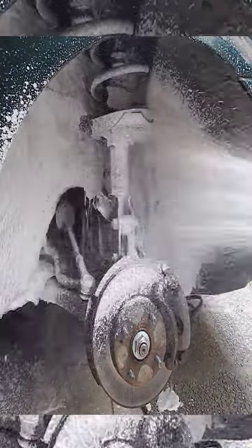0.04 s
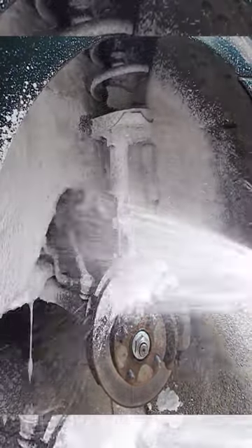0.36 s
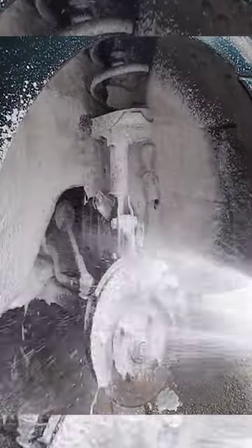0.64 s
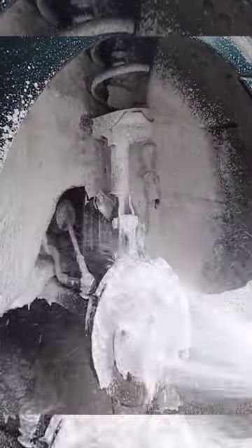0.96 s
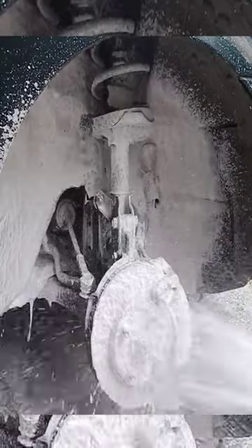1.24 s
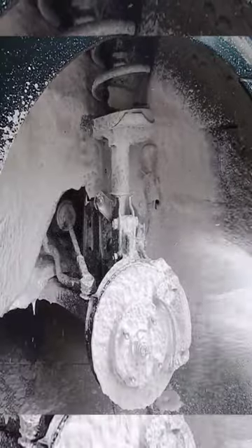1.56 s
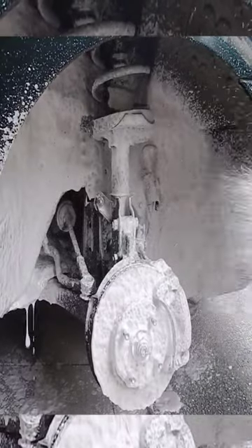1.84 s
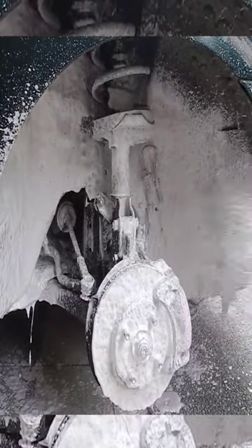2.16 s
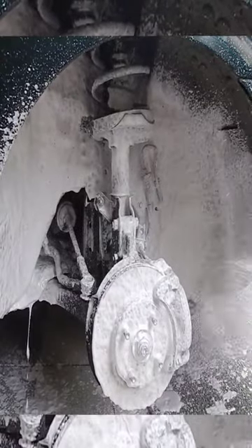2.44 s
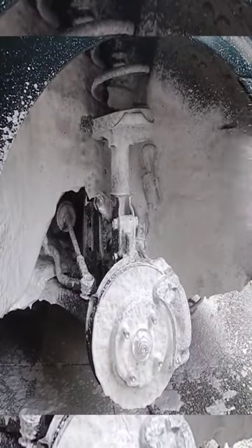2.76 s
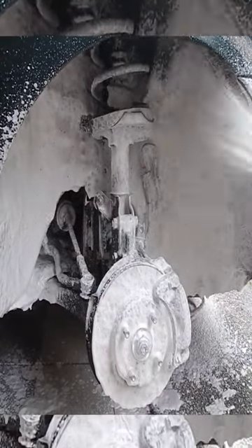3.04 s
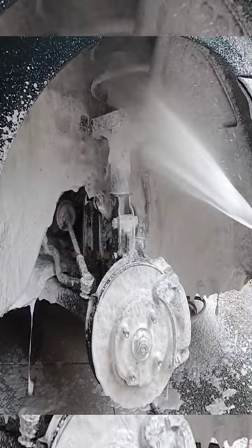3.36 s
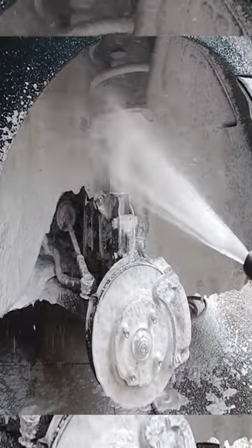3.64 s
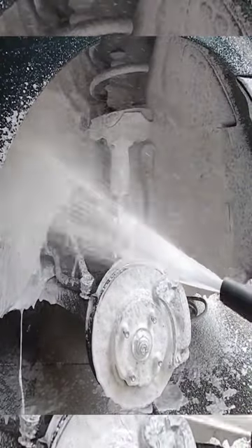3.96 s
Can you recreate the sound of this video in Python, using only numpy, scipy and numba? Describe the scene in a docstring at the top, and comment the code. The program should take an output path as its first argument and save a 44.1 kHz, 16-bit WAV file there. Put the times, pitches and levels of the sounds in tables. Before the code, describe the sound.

A pressure washer sprays foam into a car's wheel arch, hissing and fizzing continuously close to the microphone. The jet splashes on metal and shifts in tone as it sweeps, while the pump drones underneath.

```python
"""At a car's wheel arch, a pressure washer's foam lance sweeps over the arch and brake disc, close by.
The three-piston pump drones and makes the jet's low roar throb; the lance sputters with a ring near 2 kHz.
The spray rings in the hollow arch, splashes on metal and fizzes with fine droplets, its tone changing
as the aim moves. Near the end, a faint draught from the jet reaches the single microphone."""
import sys
import numpy as np
from scipy import signal
from scipy.fft import rfft, irfft
from scipy.io import wavfile
from scipy.ndimage import map_coordinates
from numba import njit

SR = 44100
rng = np.random.default_rng(int(sys.argv[2]) if len(sys.argv) > 2 else 0)


def unload_wav(signal):
    """Save mono or channel-first audio to the path in sys.argv[1] as 16-bit WAV at rate SR, clipped to [-1, 1]."""
    wavfile.write(
        sys.argv[1],
        SR,
        np.round(np.clip(np.atleast_2d(signal).T, -1, 1) * 32767).astype(np.int16),
    )


N = 176400  # 4 seconds
TOP_HZ = 15650  # the treble is cut off above this


def gain(db):
    """Turn decibels into a number to multiply a sound by."""
    return 10 ** (np.asarray(db) / 20)


def normalise(x):
    """Scale a signal so that its average strength (rms) is 1."""
    return x / np.sqrt(np.mean(x ** 2))


def curve(rows):
    """Join (time, value) rows with straight lines, giving one value per sample."""
    return np.interp(np.arange(N) / SR, *np.array(rows).T)


def wander(per_s):
    """A smooth random wobble of strength 1 that changes about per_s times a second."""
    hz = np.arange(N // 2 + 1) * SR / N
    keep_slow = np.exp(-(2 * hz / per_s) ** 2) * (hz > 0)
    return normalise(irfft(rfft(rng.standard_normal(N)) * keep_slow, N))


def colour(x, tone):
    """Shape a sound's tone with (frequency, level) rows, then scale it to strength 1."""
    hz, db = np.array(tone).T
    bin_hz = np.maximum(np.arange(N // 2 + 1) * SR / N, 1)
    bin_db = np.interp(np.log(bin_hz), np.log(hz), db)
    return normalise(irfft(rfft(x) * gain(bin_db), N))


@njit
def resonate(x, hz, width_hz):
    """Let through only a band of sound around a moving pitch (a state-variable filter)."""
    out = np.empty(len(x))
    band_state, low_state = 0., 0.
    for i in range(len(x)):
        tuning, damping = np.tan(np.pi * hz[i] / SR), width_hz / hz[i]
        band = (band_state + tuning * (x[i] - low_state)) / (1 + tuning * (tuning + damping))
        band_state = 2 * band - band_state
        low_state += 2 * tuning * band
        out[i] = damping * band
    return out


def pump_drone(shaft_angle):
    """The shaft and pistons hum in tones that drift and waver; the higher ones waver more."""
    # pump tones; multiples of 3 come from the piston strokes
    # (multiple of shaft speed, relative level at mid-scene [dB], drift [dB/s])
    tones = [(1, -20.5, 0), (2, -24, -1.5), (3, -1.5, 0), (5, -11, -0.5), (6, 0.5, 0), (7, -17, -0.5),
             (8, -8.5, 0.3), (9, -13.5, -0.5), (10, -13, -2), (11, -22, -0.5), (12, -12.5, .5),
             (13, -14.5, -1), (14, -18, 1.5), (15, -22.5, 1), (16, -16.5, 1), (17, -20, -1),
             (18, -11.5, 0.5), (20, -17, 3.5), (25, -15.5, 1)]
    # swell of the tones above the piston stroke as the aim moves (time [s], level [dB])
    overtone_swell = [(0, -1), (.7, 1), (1.1, -1), (1.75, 1), (2.3, 1.5), (2.85, -0.5), (3.25, -2.5),
                      (3.8, -2.5), (4, -1)]
    # loudness of the drone (time [s], level [dB])
    loudness = [(0.0, -34.5), (0.15, -38), (0.63, -36.5), (0.81, -39), (1.14, -36), (1.35, -37), (1.5, -36),
                (1.92, -36.3), (2.25, -42), (2.76, -36), (3.03, -34), (3.12, -39), (3.54, -35),
                (3.63, -36.5), (3.96, -31), (4.0, -33.6)]
    swell_db = curve(overtone_swell)
    from_middle_s = (np.arange(N) - N / 2) / SR
    drone = 0
    for multiple, db, drift in tones:
        waver_db = 1.5 * np.sqrt(multiple / 10) * wander(per_s=6.5)
        strength = gain(db + drift * from_middle_s + waver_db + (multiple > 3) * swell_db)
        drone += strength * np.sin(multiple * shaft_angle + 2 * np.pi * rng.random())
    return normalise(drone) * gain(curve(loudness) + 1)


def jet_roar(shaft_angle):
    """The jet drums in the arch, throbbing with each turn of the pump."""
    # loudness of the low roar (time [s], level [dB])
    loudness = [(0.0, -37), (0.09, -40), (0.6, -38.0), (0.66, -36.5), (0.75, -38.5), (0.99, -38.5),
                (1.11, -41), (1.23, -39), (1.47, -39.6), (1.65, -37.1), (1.86, -37.5), (1.98, -41),
                (2.37, -42.5), (2.61, -38), (2.91, -38), (3.15, -42), (3.69, -39), (4.0, -33)]
    # tone of the roar (frequency [Hz], relative level [dB])
    tone = [(25, -26), (50, -14), (95, -3), (150, -8.5), (240, -1), (480, 0.5), (740, -3.5), (1130, -.5),
            (1400, -5.5), (1700, 0), (1950, -5), (2400, -7.5), (3200, -19), (6000, -50)]
    throb = 1 + 0.24 * np.cos(shaft_angle)
    roar = colour(rng.standard_normal(N) * throb, tone)
    flicker_db = wander(per_s=28)
    return roar * gain(curve(loudness) + flicker_db)


def lance_ring():
    """Air and foam make the lance ring at one wavering pitch, in quick sputters."""
    # pitch at which the lance rings (time [s], frequency [Hz])
    pitch = [(0, 1960), (0.2, 1960), (0.38, 1960), (0.75, 1960), (1.05, 1974), (1.24, 2020), (1.48, 1920),
             (1.6, 1989), (2.0, 1920), (2.5, 1977), (2.9, 1955), (3.3, 1936), (3.53, 2030), (3.7, 1960),
             (4, 1990)]
    # loudness of the ring (time [s], level [dB])
    loudness = [(0.0, -34), (0.12, -36.5), (0.27, -33.5), (0.48, -37.5), (0.57, -33.5), (0.69, -37),
                (1.11, -35.3), (1.17, -40.5), (1.38, -34), (1.44, -36), (1.83, -35.5), (1.98, -35),
                (2.46, -39.5), (2.58, -38), (3.03, -31.5), (3.12, -39.5), (3.39, -36.6), (3.6, -39.2),
                (3.84, -34.5), (4.0, -37.5)]
    hz = curve(pitch) + 24 * wander(per_s=25)
    flow = resonate(rng.standard_normal(N), hz, width_hz=1090.)
    sputter_db = 2 * np.tanh(wander(per_s=160))
    ring = resonate(flow, hz, width_hz=123.) * gain(sputter_db)
    return normalise(ring) * gain(curve(loudness) + 0.4)


def arch_ring():
    """The spray makes the hollow arch ring near 3 kHz."""
    # loudness of the hollow ring (time [s], level [dB])
    loudness = [(0, -43.5), (.09, -42.5), (.24, -37.5), (.39, -43.5), (.75, -38), (.81, -44), (1.05, -40.5),
                (1.2, -42), (1.35, -39.5), (1.44, -42), (1.8, -39.5), (2.19, -39.5), (2.45, -47.5),
                (2.68, -42), (2.73, -36.5), (2.92, -35.5), (3.02, -38), (3.07, -45.5), (3.18, -43),
                (3.42, -46.5), (3.74, -42.5), (3.81, -37), (4, -36.5)]
    # tone of the hollow ring (frequency [Hz], relative level [dB])
    tone = [(1500, -25), (2300, -5.5), (2850, 1.5), (3300, 0), (3750, -9), (4500, -15), (7000, -50)]
    ring = colour(rng.standard_normal(N), tone)
    flicker_db = 0.69 * wander(per_s=38)
    return ring * gain(curve(loudness) + 0.5 + flicker_db)


def droplets(per_s, share):
    """Tiny hits of very uneven size over a smooth rush of mist; share is the hits' part of the power."""
    size_db = 3.5 * np.minimum(rng.exponential(size=N), 6)
    lands = rng.random(N) < per_s / SR
    hits = lands * rng.choice([-1, 1], N) * gain(size_db)
    return np.sqrt(share) * normalise(hits) + np.sqrt(1 - share) * rng.standard_normal(N)


def patchy(x, bands=28):
    """Neighbouring frequency bands swell and sink on their own as the jet meets new surfaces."""
    spectrum = rfft(x)
    hz = np.arange(N // 2 + 1) * SR / N
    position = np.minimum(hz / TOP_HZ, 1) * (bands - 1)
    total = 0
    for band in range(bands):
        weight = np.maximum(1 - abs(position - band), 0)
        total += irfft(spectrum * weight, N) * gain(0.8 * wander(per_s=13))
    return normalise(total)


def metal_splash():
    """Thousands of drops a second hit the metal and blur into a bright splash."""
    # loudness of the splash (time [s], level [dB])
    loudness = [(0.0, -29.5), (0.12, -39), (0.24, -35), (0.33, -38.6), (0.45, -34.5), (0.51, -38.5),
                (0.63, -34), (0.75, -33.5), (0.87, -40), (1.02, -37.5), (1.05, -35), (1.26, -34.5),
                (1.38, -37.5), (1.47, -43.5), (1.56, -37), (1.83, -37.5), (2.07, -38.8), (2.16, -37),
                (2.43, -45.5), (2.52, -44), (2.88, -35.8), (3.03, -36), (3.09, -39.5), (3.24, -36),
                (3.39, -38.5), (3.66, -37.5), (3.78, -35.5), (4.0, -31)]
    # tone of the splash (frequency [Hz], relative level [dB])
    tone = [(1500, -23), (3200, -10), (3900, -4), (4300, -1), (4800, -0.5), (5200, -1.5), (6200, 0),
            (7400, 0), (8400, -1.5), (10000, -4), (15500, -31)]
    drops = patchy(droplets(per_s=5000, share=0.26))
    return colour(drops, tone) * gain(curve(loudness) + 1.33)


def foam_fizz():
    """Fine droplets of foam fizz high in the treble, near 10 kHz."""
    # loudness of the fizz (time [s], level [dB])
    loudness = [(0.0, -30), (0.12, -37.5), (0.27, -36), (0.33, -39), (0.39, -35), (0.54, -36),
                (0.63, -32.2), (0.9, -37.5), (1.26, -35.5), (1.5, -37.5), (1.71, -33.6), (1.77, -37),
                (1.92, -30), (2.13, -37), (2.19, -34.5), (2.52, -39.5), (2.76, -36), (2.85, -40),
                (3.03, -32.7), (3.18, -37.5), (3.36, -36), (3.42, -33.5), (3.66, -36), (3.84, -36),
                (3.96, -34.5), (4.0, -38)]
    # tone of the fizz (frequency [Hz], relative level [dB])
    tone = [(3000, -50), (6500, -18), (8200, -5.5), (9100, 0.5), (10400, 0), (11300, -1.5), (12100, -7.5),
            (13500, -22), (15700, -36)]
    drops = patchy(droplets(per_s=4000, share=0.31))
    return colour(drops, tone) * gain(curve(loudness) + 0.5)


def fine_mist():
    """The finest mist hisses at the very top of the treble, near 13 kHz."""
    # loudness of the mist (time [s], level [dB])
    loudness = [(0.0, -36.0), (0.12, -43.2), (0.42, -41.0), (0.54, -43.0), (0.78, -39.7), (0.93, -42.9),
                (1.05, -38), (1.11, -43.9), (1.38, -40.7), (1.5, -44.2), (1.95, -37.5), (2.13, -43.1),
                (2.19, -40.0), (2.52, -46), (2.64, -39.5), (2.82, -42), (3.03, -38), (3.12, -46),
                (3.42, -40), (3.75, -43), (3.84, -44.2), (4.0, -42.1)]
    # tone of the mist (frequency [Hz], relative level [dB])
    tone = [(8000, -28), (11000, -5), (12000, -0.5), (13000, 1.5), (14000, -3.5), (15000, -6.5),
            (15700, -11)]
    drops = droplets(per_s=4000, share=0.31)
    return colour(drops, tone) * gain(curve(loudness) + 1)


def short_echo(hiss):
    """A faint, very short, upside-down echo ripples the tone of the hiss as the aim moves."""
    # how late the echo arrives (time [s], delay [ms])
    delay = [(0, .736), (.7, .762), (1.35, .768), (1.65, .742), (2.2, .726), (2.6, .75), (2.95, .722),
             (3.27, .682), (3.7, .69), (4, .72)]
    earlier_sample = np.arange(N) - curve(delay) * SR / 1000
    return hiss - gain(-19) * map_coordinates(hiss, [earlier_sample], mode="mirror")


def spray():
    """Hollow ring, splash, fizz and mist all flutter together, because one jet drives them."""
    hiss = arch_ring() + metal_splash() + foam_fizz() + fine_mist()
    flutter_db = 0.6 * wander(per_s=71)
    return short_echo(hiss) * gain(flutter_db)


def draught(start_s=3.52, rise_s=0.1):
    """As the lance comes close, air moved by the jet rumbles faintly on the microphone."""
    # tone of the rumble (frequency [Hz], relative level [dB])
    tone = [(15, -3), (40, 0), (70, -2), (150, -15), (500, -50)]
    fade_in = np.clip((np.arange(N) / SR - start_s) / rise_s, 0, 1)
    return colour(rng.standard_normal(N), tone) * fade_in * gain(-62)


def scene():
    """All the sounds meet at one microphone, the same in both channels."""
    # speed of the pump's shaft (time [s], speed [turns/s])
    shaft_speed = [(0, 65.58), (.55, 65.58), (.8, 65.44), (1.2, 65.64), (2.75, 65.64), (3.1, 65.88),
                   (4, 65.86)]
    turns_per_s = curve(shaft_speed) * (1 + 0.0018 * wander(per_s=16.7))
    shaft_angle = 2 * np.pi * np.cumsum(turns_per_s) / SR
    mono = pump_drone(shaft_angle) + jet_roar(shaft_angle) + lance_ring() + spray() + draught()
    return np.array([mono, mono])


def record(dry):
    """The recorder cuts four narrow gaps in the treble and removes the very top."""
    # centres of the gaps (frequency [Hz])
    gaps = [2500, 5000, 7500, 10000]
    gap_width_hz = 112
    for hz in gaps:
        dry = signal.lfilter(*signal.iirnotch(hz, hz / gap_width_hz, fs=SR), dry)
    top_cut = signal.ellip(12, .1, 90, TOP_HZ, fs=SR, output="sos")
    return signal.sosfilt(top_cut, dry)


dry = scene()
out = record(dry)
unload_wav(out)
```